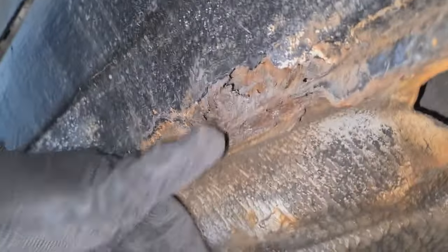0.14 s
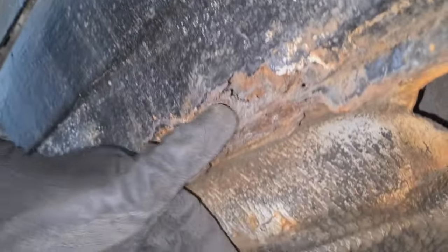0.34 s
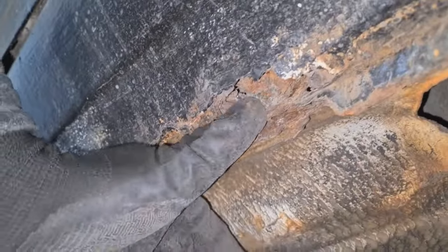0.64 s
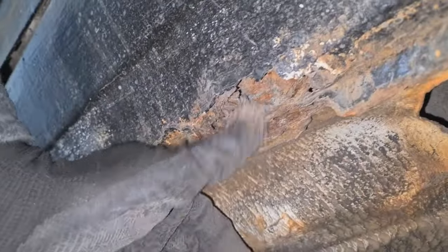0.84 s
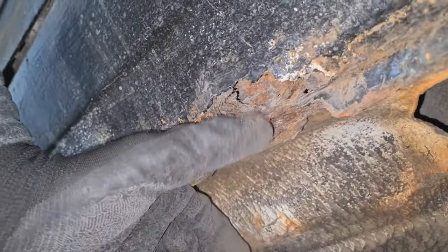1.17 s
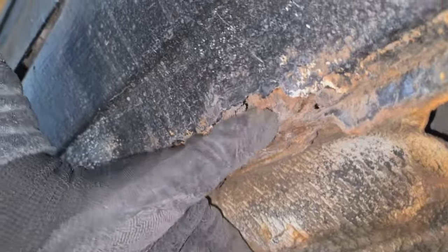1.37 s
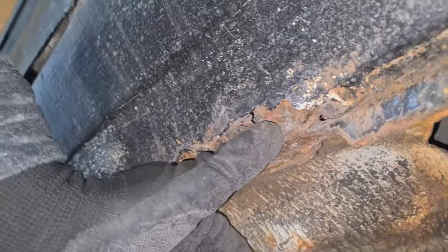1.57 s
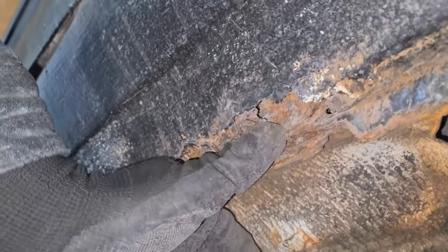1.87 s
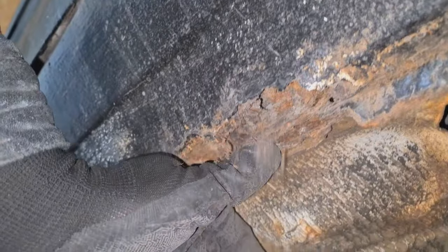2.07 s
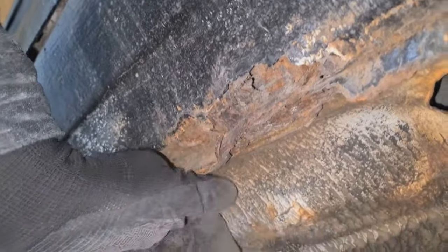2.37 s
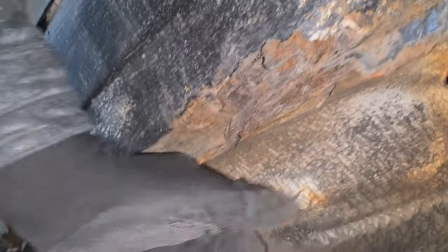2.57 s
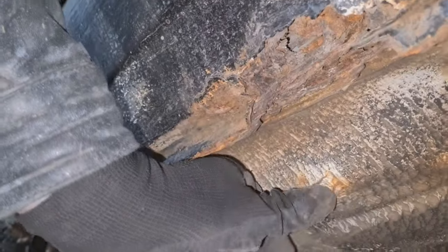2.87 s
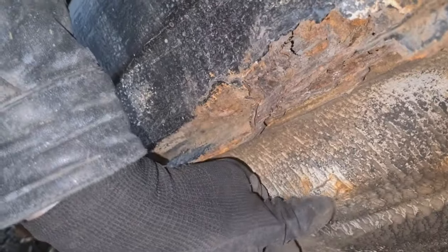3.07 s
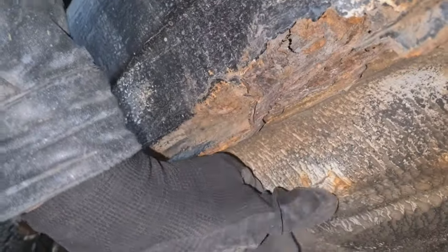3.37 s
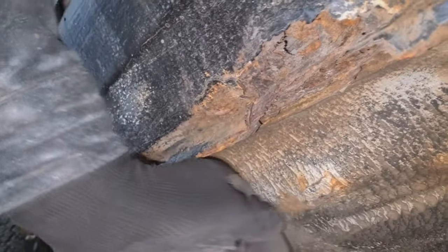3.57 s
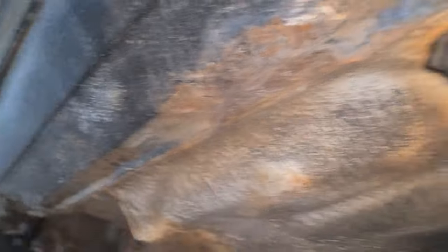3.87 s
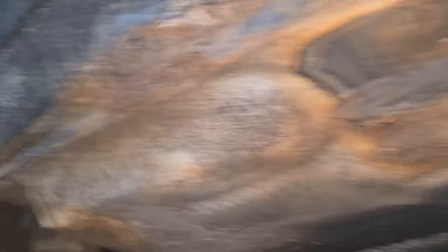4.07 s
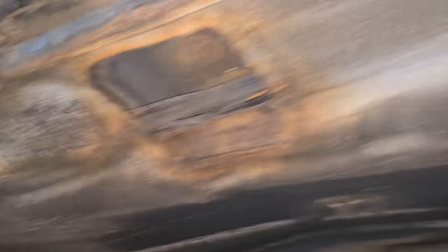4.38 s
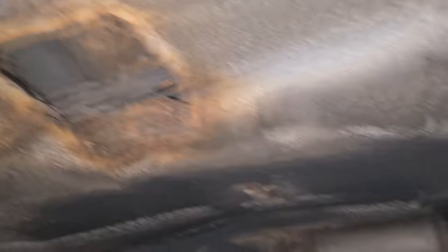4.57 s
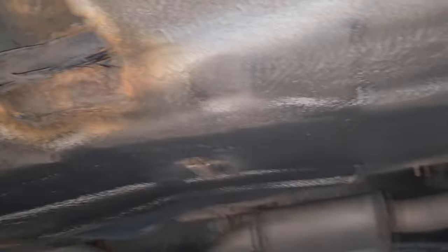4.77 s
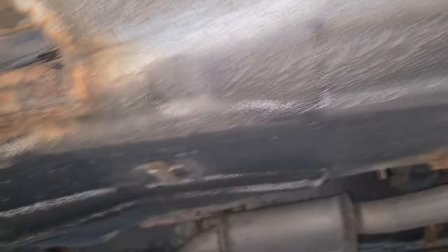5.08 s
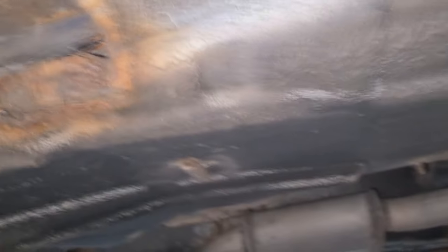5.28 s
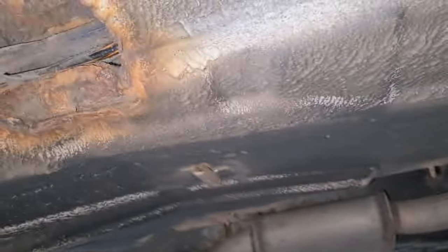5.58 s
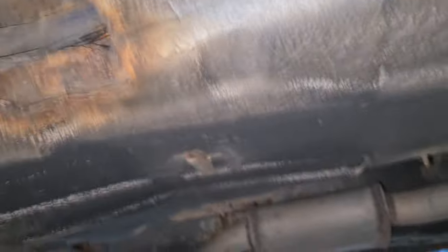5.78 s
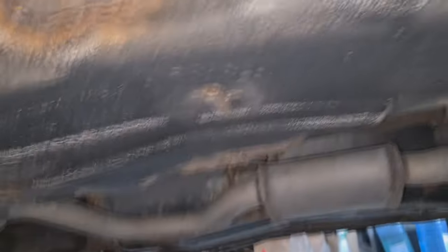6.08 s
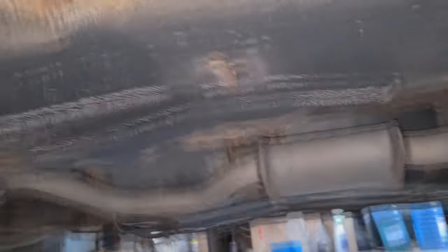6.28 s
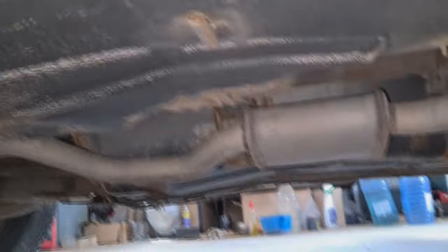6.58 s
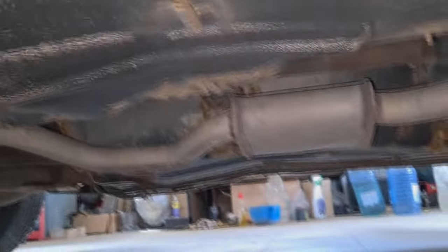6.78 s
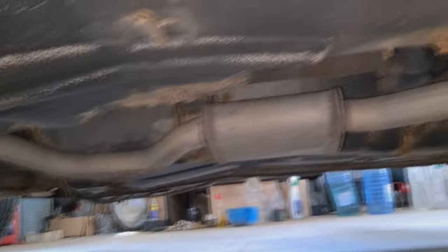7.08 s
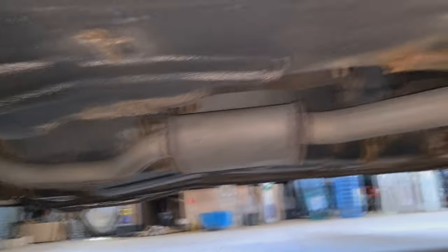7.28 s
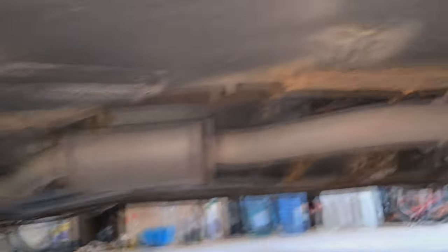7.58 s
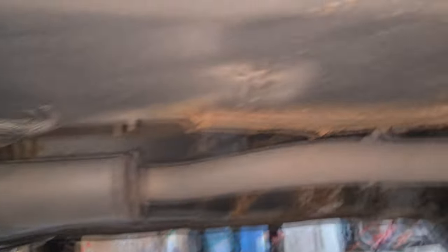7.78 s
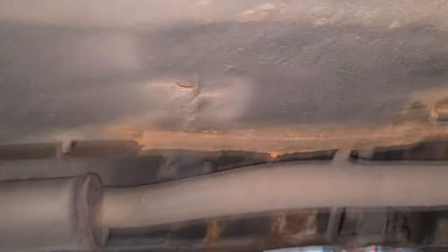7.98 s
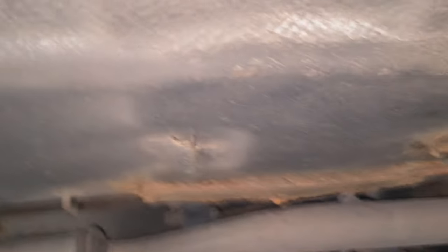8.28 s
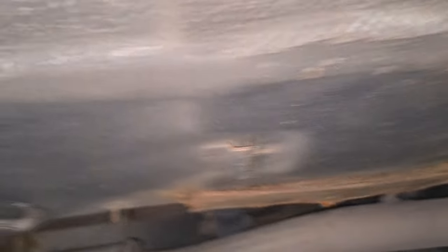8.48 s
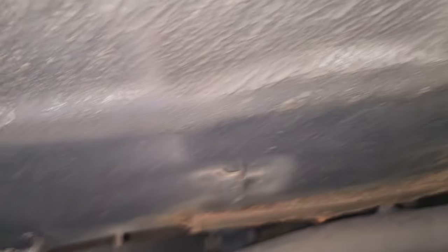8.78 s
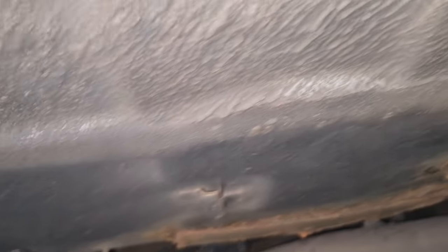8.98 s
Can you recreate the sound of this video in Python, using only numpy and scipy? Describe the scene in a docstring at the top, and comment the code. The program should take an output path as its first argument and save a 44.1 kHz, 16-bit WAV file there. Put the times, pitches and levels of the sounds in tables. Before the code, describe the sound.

A gloved hand scrapes, taps and snaps brittle rusty sheet metal up close, then a jacket sleeve swishes past over deep engine hum.

```python
"""A gloved hand rubs and prods rusty metal under a car: filtered bursts of random catches scrape and crack.
Knocks, booms and ringing modes add hollow taps, thuds, snaps and zings to the contact.
From about four seconds a jacket sleeve swishes close by, in dense noisy grains, as prods and taps go on.
Behind are two engines gliding in speed, as harmonic tones, a deep hum, faint machine tones and noisy air."""
import sys
import numpy as np
from scipy import signal
from scipy.fft import rfft, irfft
from scipy.io import wavfile
from scipy.ndimage import uniform_filter1d

SR = 44100
rng = np.random.default_rng(int(sys.argv[2]) if len(sys.argv) > 2 else 0)


def inscribe(sig):
    """Save sig as 16-bit PCM at rate SR to the path in sys.argv[1].

    A 1-D sig is mono; a 2-D sig holds one channel per row.
    Samples are clipped to [-1, 1] before scaling.
    """
    pcm = np.round(np.clip(np.atleast_2d(sig).T, -1, 1) * 32767)
    wavfile.write(sys.argv[1], SR, pcm.astype(np.int16))


N = 403074
T = np.arange(N) / SR


def undb(db):
    """Decibels to gain."""
    return 10 ** (np.asarray(db) / 20)


def unit(x):
    """Scale to rms 1."""
    return x / np.sqrt(np.mean(x ** 2) + 1e-20)


def decay(t, t60):
    """Exponential fade that falls 60 dB in t60 seconds."""
    return np.exp(-np.log(1000) * t / t60)


def controls(rows):
    """The columns of a curve table, interpolated at every sample."""
    s, *columns = np.transpose(rows)
    return [np.interp(T, s, column) for column in columns]


def band(x, lo_hz, hi_hz, order=2):
    """Butterworth band-pass."""
    sos = signal.butter(order, [lo_hz, min(hi_hz, SR / 2 - 1)], "band", fs=SR, output="sos")
    return signal.sosfilt(sos, x + 1e-18)


def colour(x, spectrum):
    """Minimum-phase filter with the given (f/Hz, gain/dB) shape."""
    size = 2048
    hz, db = np.transpose(spectrum)
    f = np.maximum(np.arange(size // 2 + 1) * SR / size, 1)
    gain = undb(np.interp(np.log(f), np.log(hz), db))
    # folding the cepstrum puts the filter's energy as early as it can go
    cepstrum = irfft(np.log(gain))
    cepstrum[1:size // 2] *= 2
    cepstrum[size // 2 + 1:] = 0
    response = irfft(np.exp(rfft(cepstrum)))
    return np.apply_along_axis(signal.oaconvolve, -1, x, response)[..., :N]


def walk(rate):
    """Smooth random wander of rms 1, with a new target `rate` times a second."""
    k = int(SR / rate)
    steps = np.repeat(rng.standard_normal(N // k + 1), k)
    return unit(uniform_filter1d(steps, k)[:N])


def place(x, pan_db):
    """Lean a sound to the left (positive) or right (negative)."""
    left = undb(pan_db)
    return x * np.array([[left], [1]]) * 2 / (1 + left)


def registers(x):
    """Boom, scrape, rasp and hiss of a stereo contact sound, each with its centre at rms 1."""
    edges = [(150, 760), (800, 2500), (2500, 7000), (7000, 17000)]
    filters = [signal.butter(3, edge, "band", fs=SR, output="sos") for edge in edges]
    parts = [signal.sosfiltfilt(sos, x) for sos in filters]
    return [part / part.mean(axis=0).std() for part in parts]


def blend(scrape, rasp, rasp_db):
    """A sharper contact moves energy from the scrape into the rasp."""
    share = np.clip(undb(rasp_db), .05, .96)
    return np.sqrt(1 - share ** 2) * scrape + share * rasp


def catches(per_s, spread_db):
    """Tiny catches of a rough surface at random moments, with random strength and polarity."""
    hit = rng.random(N) < per_s / SR
    strength = undb(spread_db * np.minimum(rng.exponential(size=N), 4))
    return hit * rng.standard_normal(N) * strength


def grains(per_s, spread_db, own_db):
    """Catches reach both ears; their scatter off nearby surfaces is separate noise at each ear."""
    shared = catches(per_s, spread_db)
    burst = np.sqrt(np.abs(signal.lfilter([.02], [1, -.98], shared ** 2)))  # fast rise, short tail
    return shared + undb(own_db) * burst * rng.standard_normal((2, N))


def shifting(x, depth_db):
    """As the contact point moves, different resonances come and go: six bands wander in level."""
    edges = np.geomspace(800, 6400, 7)
    return x + sum((undb(depth_db * walk(9)) - 1) * band(x, lo, hi, order=1)
                   for lo, hi in zip(edges, edges[1:]))


# resonances of the gap under the floor pan: f/Hz, width/Hz, level/dB
GAP_RESONANCES = [(1093, 135, -1.5), (1670, 130, -7.5), (2590, 53, -12), (3400, 87, -13), (3420, 330, -13),
                  (9020, 640, -0.5)]


def cavity(x):
    """The narrow space under the car favours a few bands."""
    return x + sum(undb(db) * band(x, hz - width / 2, hz + width / 2, order=1)
                   for hz, width, db in GAP_RESONANCES)


def swell(start, length, growth_db, db):
    """Power of one movement: it sets in, grows or wanes evenly in dB while it lasts, and dies away."""
    # each flank spans 30 dB in its own time plus an edge that softens long swells
    attack_s, release_s, edge = 0.008, 0.02, 0.48 * length
    before = np.maximum(start - T, 0) / (attack_s + edge)
    after = np.maximum(T - start - length, 0) / (release_s + edge)
    outside = before + after
    drop_db = 20 * np.minimum(outside * (1 + outside / 2), 10)
    progress = np.clip((T - start) / length, 0, 1)
    return undb(db + growth_db * (progress - .5) - drop_db) ** 2


def strokes(rows):
    """Overlapping strokes add in power: their level, and the rasp and hiss against it, in dB."""
    power = np.zeros((3, N))
    for start, length, growth_db, db, rasp_db, hiss_db in rows:
        power += np.outer(undb([0, rasp_db, hiss_db]) ** 2, swell(start, length, growth_db, db))
    total, rasp, hiss = 10 * np.log10(power)
    return total, rasp - total, hiss - total


# tone of the room air: f/Hz, gain/dB
AIR_SPECTRUM = [(59, -19.5), (100, -12), (249, -24.5), (328, -30), (513, -34), (634, -33), (801, -40.5),
                (1150, -40.5), (1280, -43.5), (2220, -47.5), (4470, -54), (6420, -71), (16000, -58.5)]
# how the room air rises and falls, before trim: t/s, level/dB
AIR_LEVEL = [(0, -62.5), (1.2, -65), (2.2, -64.5), (2.8, -67), (4.2, -64), (5.5, -67.5), (6.4, -64.5),
             (6.8, -58.5), (7.3, -64.5), (7.8, -60.5), (9.14, -65.5)]


def air(rumble_db=-55, side_db=-14, air_db=-0.5):
    """Room air: a rumble common to both ears under a faint diffuse hiss, both of filtered noise."""
    db, = controls(AIR_LEVEL)
    mid, side = (colour(rng.standard_normal(N), AIR_SPECTRUM) for _ in range(2))
    side = undb(side_db) * side + 0.68 * band(side, 630, 17000, order=1)
    hiss = (mid + np.array([side, -side])) / band(mid, 220, 700).std()
    rumble = unit(band(rng.standard_normal(N), 33.5, 102.0, order=3))
    return undb(db + air_db) * hiss + undb(rumble_db) * rumble


# faint machine tones that come and go: start t/s, length t/s, f/Hz, level/dB
MACHINE_TONES = [(0, 1.65, 141.1, -61.5), (2.8, 0.15, 136.2, -53.5), (2.898, 2.8, 113.5, -61),
                 (3.899, 2.03, 142.3, -63.5), (3.6, 1.49, 353, -77), (4.9, 0.9, 631, -79),
                 (6.003, 8.8, 172.1, -66), (6.702, 1, 99.7, -53.5)]


def tones(drift=.004, waver_db=2, fade_s=0.25):
    """Machine tones as sines that waver in pitch and level, with fades outside their listed spans."""
    out = np.zeros(N)
    for start, length, hz, db in MACHINE_TONES:
        fade = np.clip(np.minimum(T - start, start + length - T) / fade_s + 1, 0, 1)
        level = undb(db + waver_db * walk(3))
        phase = 2 * np.pi * np.cumsum(hz * (1 + drift * walk(4))) / SR
        out += fade * level * np.sin(phase)
    return np.sqrt(2) * out


# swells of the deep hum: start t/s, length t/s, growth/dB, level/dB
HUM_SWELLS = [(1.4, 0.46, 0, -42), (3.74, 0.33, -1, -44), (6.196, 0.5, 4, -39), (7.7, 1.37, 0, -46.5)]


def hum(centre_hz=46.8, drift=0.012):
    """A deep, nearly pure sine drifts slightly in pitch and swells now and then."""
    phase = 2 * np.pi * np.cumsum(centre_hz * (1 + drift * walk(1.89))) / SR
    return np.sqrt(2 * sum(swell(*row) for row in HUM_SWELLS)) * np.sin(phase)


# standing waves of the garage that lift the engines' overtones: f/Hz, width/Hz, level/dB
GARAGE_WAVES = [(101.46, 1.76, 21), (138.6, 2.6, 7), (163.5, 19.3, 6)]
# an engine that picks up from idle, holds its speed and fades: t/s, firing f/Hz, level/dB
STEADY_ENGINE = [(0, 50.47, -43.5), (1.15, 51.21, -42.5), (1.68, 47.37, -45), (2.2, 61.66, -37.5),
                 (2.7, 63.9, -43), (3.1, 62.23, -52), (3.85, 60.27, -40.5), (5.7, 59.92, -43.5),
                 (6.35, 60.45, -39.5), (6.75, 59.96, -48), (7.1, 59.3, -68), (9.14, 58.45, -66)]
# an engine that runs fast, drops and pulls again: t/s, firing f/Hz, level/dB
FAST_ENGINE = [(0, 76.85, -46.5), (1.3, 72.84, -49), (2, 83.1, -48.5), (2.85, 67.4, -47),
               (3.6, 76.8, -39.5), (4.3, 78.1, -48.5), (5.85, 77.8, -45.5), (6.25, 74.97, -37.5),
               (6.6, 72.27, -42), (7.05, 61.36, -35), (7.42, 51.5, -39.5), (7.7, 61.05, -32.5),
               (8, 63.4, -39), (8.7, 62.95, -36), (9.14, 56.6, -42)]


def engine(rows, half_db, second_db, third_db, waver_db, sway_db):
    """Walls pass the firing tone, uneven cylinders' half tone and overtones; standing waves lift these."""
    hz, db = controls(rows)
    phase = 2 * np.pi * np.cumsum(hz) / SR
    half = undb(half_db) * band(np.sin(phase / 2), 33.4, 57, order=6)
    second = undb(second_db + 2 * walk(3.1)) * np.sin(2 * phase)
    third = undb(third_db + 2 * walk(4.1)) * np.sin(3 * phase)
    overtones = second + third
    standing = sum(undb(lift) * band(overtones, f - width / 2, f + width / 2, order=1)
                   for f, width, lift in GARAGE_WAVES)
    level = undb(db + waver_db * walk(12) + sway_db * walk(2.99))
    return np.sqrt(2) * level * (np.sin(phase) + half + overtones + standing)


# tone of the jacket cloth: f/Hz, gain/dB
CLOTH_SPECTRUM = [(200, -7), (400, -9.5), (750, -10), (1000, 0.5), (1350, 2.5), (1700, 5), (2100, 3),
                  (3300, 1.5), (4600, -2), (5600, -10.5), (7200, -27.5), (9000, -28), (12000, -24.5),
                  (16000, -28)]
# sleeve strokes, before trim:
# start t/s, length t/s, growth/dB, level/dB, rasp relative level/dB, hiss relative level/dB
SLEEVE_STROKES = [(3.87, 0.12, -1, -71.5, -4.5, -15), (4.03, 0.13, 2, -68, -5.5, -9),
                  (4.21, 0.18, 3, -69, -5.5, -14), (4.405, 0.07, -1, -63.5, -3, -4.5),
                  (4.49, 0.086, -4, -66.5, -4.5, -11), (4.62, 0.19, 2.5, -70.5, -3, -7),
                  (4.87, .13, -1, -71.5, -4, -10.5), (4.693, 0.018, 2, -61.5, -4.5, -6),
                  (5.19, 0.31, -4.5, -76.5, -8.5, -11), (5.62, 0.33, 4.5, -77, -3.5, 0.5),
                  (5.798, 0.042, -1, -55.5, -1.5, -7.5), (6.089, 0.018, 6, -47.5, -4, -8.5),
                  (6.135, 0.025, -2, -48, -5, -5), (6.18, .22, -5, -64, -4, -8),
                  (6.56, 0.26, -9.5, -60, -5.5, -4), (6.84, 0.21, -2, -60, -4, -10),
                  (6.915, 0.031, 1, -52, -3, -14.5), (7.088, 0.028, 2, -44.5, -0.5, -3),
                  (7.122, 0.061, -3, -44, -2.5, -4), (7.205, 0.069, -0.5, -43.5, -1.5, -2),
                  (7.37, 0.037, -3, -46.5, -2, -11.5), (7.435, 0.035, -1, -54, -2.5, -10.5),
                  (7.48, 0.29, -0.5, -63, -6, -14), (7.74, 0.072, 1, -60.5, -5.5, -15),
                  (7.83, 0.092, 0.5, -54.5, -5, -16.5), (7.96, .07, 1, -55, -3.5, -14),
                  (8.04, 0.098, 5, -48.5, -1, -1), (8.22, 0.34, 1.5, -65.5, -3, -6.5),
                  (8.63, 0.062, -0.5, -60, -4.5, -13), (8.74, 0.31, 1.5, -68, -4, -14.5)]


def sleeve(flap_db=-20, gain_db=-1):
    """Fine threads slide over each other at the right, gripping and slipping: a dense, gritty swish."""
    db, rasp_db, hiss_db = strokes(SLEEVE_STROKES)
    slips = undb(1.5 * walk(140) + 1.0 * walk(22))
    threads = grains(per_s=8300, spread_db=0.0, own_db=14.0) * slips
    swish = shifting(cavity(colour(threads, CLOTH_SPECTRUM)), depth_db=1.5)
    flap, scrape, rasp, hiss = registers(swish)
    body = place(blend(scrape, rasp, rasp_db), pan_db=-7.0)
    sound = body + undb(hiss_db) * hiss + undb(flap_db) * flap
    return sound * undb(db + gain_db)


# the hand's weight thuds into the panel, before trim: t/s, level/dB
HAND_THUDS = [(0.867, -39), (.895, -32), (0.907, -41), (0.920, -41), (0.935, -45), (0.947, -40.5),
              (2.133, -42), (2.244, -46), (2.342, -39.5), (3.257, -44)]


def thuds(t60=0.048, gain_db=-1.5):
    """A push of the whole finger flexes the panel, which booms for a moment as low band noise."""
    out, t = np.zeros(N + SR), T[:SR // 6]
    for s, db in HAND_THUDS:
        i = int(s * SR)
        boom = unit(band(rng.standard_normal(len(t)), 140, 310))
        out[i:i + len(t)] += undb(db + gain_db) * boom * decay(t, t60)
    return out[:N]


# blunt, hollow taps, before trim: t/s, level/dB, tuning of the panel at that spot [ratio]
PANEL_TAPS = [(0.198, -38.5, 0.98), (0.867, -42, .97), (0.939, -34, 1), (1.327, -47.5, 0.98),
              (1.854, -54, 0.95), (2.058, -43, 0.98), (2.284, -45, 1.07), (2.340, -33.5, 0.96),
              (2.991, -45, 1.12), (3.037, -47, 1.05), (3.254, -44, 0.93), (3.88, -52, 1.1),
              (4.740, -45.5, 1.1), (6.105, -32, 1.0), (6.171, -35.5, 1.1), (7.372, -34.5, 1.24)]
# panel modes that the taps ring: f/Hz, level/dB, decay t60/s
PANEL_MODES = [(974, -25, .04), (1045, 6, 0.03), (1160, -4, 0.038), (1440, -27, 0.026), (1740, -28, 0.033),
               (3460, -4.5, 0.029)]


def taps(knock_db=-5, knock_t60=0.032, gain_db=-8):
    """Blunt contacts give a short knock and a damped, hollow ring that differs from spot to spot."""
    out, t = np.zeros(N + SR), T[:SR // 4]
    for s, tap_db, tuning in PANEL_TAPS:
        i = int(s * SR)
        detune = tuning * (1 + 0.011 * rng.standard_normal(len(PANEL_MODES)))
        ring = sum(undb(db) * np.sin(2 * np.pi * hz * d * t) * decay(t, t60)
                   for (hz, db, t60), d in zip(PANEL_MODES, detune))
        knock = unit(band(rng.standard_normal(len(t)), 1160, 1650)) * decay(t, knock_t60)
        out[i:i + len(t)] += undb(tap_db + gain_db) * (ring + undb(knock_db) * knock)
    return place(band(out[:N], 830, 5000, order=4), pan_db=-8.5)


# springing rust edges: t/s, level/dB, bright modes against the low ones level/dB
EDGE_SNAPS = [(1.464, -53, 8), (1.607, -39, 12), (1.854, -39, -3), (2.058, -44, 0), (2.130, -35, 4),
              (2.341, -31.5, 2), (2.990, -39.5, -1), (3.036, -39.5, -1), (3.257, -33, -4), (4.735, -48, 5)]
# modes of the rusted edge: f/Hz, level/dB
EDGE_MODES = [(860, -7), (1060, 0), (1240, -4), (1710, -9), (2170, -7), (2580, -2), (3270, -3), (3590, -2),
              (4025, -7), (4720, -6)]


def snaps(t60=0.049, tick_db=2, tick_s=0.00048):
    """A stiff edge's sudden release gives a bare tick; it rings on, a little differently each time."""
    out, t = np.zeros((2, N + SR)), T[:SR // 6]
    hz, db = np.transpose(EDGE_MODES)
    bright = hz > 2000
    for s, snap_db, bright_db in EDGE_SNAPS:
        i = int(s * SR)
        tuned = hz * (1 + .012 * rng.standard_normal(len(hz)))
        modes = np.sin(2 * np.pi * np.outer(tuned, t)) * decay(t, t60)
        ring = undb(db + bright_db * bright + 2 * rng.standard_normal((2, len(hz)))) @ modes
        tick = band(rng.standard_normal((2, len(t))) * np.exp(-t / tick_s), 700, 5200)
        sound = ring / np.abs(ring).max() + undb(tick_db) * tick / np.abs(tick).max()
        out[:, i:i + len(t)] += undb(snap_db) * sound
    return place(out[:, :N], pan_db=-3.5)


# moments when the rubbing catches one resonance, before trim:
# start t/s, length t/s, growth/dB, level/dB, f/Hz
RUBBING_ZINGS = [(0.57, 0.052, -1, -63, 3290), (1.97, 0.18, 5, -67, 2600), (1.96, 0.16, 4, -67.5, 3450),
                 (2.9, 0.13, 2, -71, 3500), (3.19, 0.04, 0, -64, 2150), (6.565, .065, 0, -54.5, 3340),
                 (7.083, 0.058, -2, -45.5, 3400), (7.114, 0.17, -9, -52.5, 1676),
                 (7.82, 0.11, -1, -61, 1720), (8.054, 0.096, 2, -58.5, 1125)]


def zings(width=0.17, gain_db=2.0):
    """Fine catches ring a small cluster of resonances in broken bursts for part of a stroke."""
    out, grit = np.zeros((2, N)), grains(per_s=900, spread_db=2, own_db=0)
    flickers = [undb(4 * walk(45)) for _ in range(3)]
    for start, length, growth_db, db, hz in RUBBING_ZINGS:
        # the span leaves room for the swell's flanks
        span = slice(max(int((start - .2) * SR), 0), int((start + length + .4) * SR))
        edges = hz * (1 + width * np.linspace(-.5, .5, len(flickers) + 1))
        ring = sum(band(grit[:, span] * flicker[span], lo, hi)
                   for flicker, lo, hi in zip(flickers, edges, edges[1:]))
        out[:, span] += unit(ring) * np.sqrt(swell(start, length, growth_db, db)[span])
    return place(out, pan_db=-6.5) * undb(gain_db)


# tone of the crumbling flakes: f/Hz, gain/dB
FLAKE_SPECTRUM = [(150, -2.5), (450, -1.5), (780, -6.5), (1050, -4), (1500, -8.5), (2500, -1), (3500, -4),
                  (4800, -4), (6000, -17), (7200, -18.5), (9000, -19), (16000, -17.5)]
# fingertip prods, snapping flakes and small clicks, before trim:
# t/s, level/dB, rasp relative level/dB, hiss relative level/dB
FINGER_PRODS = [(0.139, -38, -1.5, 0.5), (0.191, -36.5, -14, -7), (0.386, -48, -6, 5),
                (0.831, -48.5, -7, -14), (0.854, -43, -11, -14), (0.867, -32.5, -15, -3),
                (0.892, -35, -11, -8), (0.900, -34, -12, -13), (0.914, -35, -19, -12),
                (0.932, -27, -10.5, -7.5), (0.94, -31.5, -11, -25), (1.606, -41, -7, -32),
                (1.855, -36.5, -20, -22), (1.984, -52, -6, -4), (2.014, -51, -7, -20),
                (2.057, -51, -11, -20), (2.127, -32, -13, -14), (2.244, -41, -13, -7),
                (2.285, -40.5, -14, -17), (2.324, -31.5, -18, -18), (2.338, -32, -6, -4.5),
                (2.376, -53, -8, -2), (2.416, -48.5, -4, 3), (2.497, -51.5, -12, 2.5),
                (2.952, -52, -10, -14), (2.989, -45.5, -5.5, -5), (3.035, -43.5, -9, -9),
                (3.137, -46, -17, -22), (3.22, -47, -18, -26), (3.256, -35, -9.5, -21),
                (3.395, -53, -18.5, -33), (3.575, -37, -11, -12), (3.679, -42, -7, -17),
                (4.126, -51, -13, -20), (4.423, -57, -6, 5), (4.732, -46, -8.5, -5.5),
                (5.788, -45.5, -10, -9), (6.085, -40, -9.5, -6.5), (6.192, -48, -7, -14),
                (6.624, -42, -17, -16), (7.367, -32.5, -14, -9.5), (7.378, -33.5, -5, -6),
                (7.406, -41, -6, -20), (8.603, -46.5, -12, 0)]


def prods(t60=0.036, crack_s=0.00041, boom_db=-13, crest_db=7, hiss_trim_db=3.0, cushion_s=0.00066):
    """Each prod is a crack, cushioned by the fabric, followed by a quickly fading crumble of grains."""
    out, t = np.zeros((2, N + SR)), T[:SR // 6]
    flakes = colour(grains(per_s=16000, spread_db=4.0, own_db=9.0), FLAKE_SPECTRUM)
    layers = np.array(registers(cavity(flakes)))
    fade = decay(t, t60) + np.exp(-t / crack_s)
    fade *= 1 - np.exp(-t / cushion_s)  # the fabric softens the onset
    for s, db, rasp_db, hiss_db in FINGER_PRODS:
        i = int(s * SR)
        boom, scrape, rasp, hiss = layers[:, :, i:i + len(t)]
        crumble = undb(boom_db) * boom + blend(scrape, rasp, rasp_db + crest_db)
        crumble += undb(hiss_db + hiss_trim_db) * hiss
        out[:, i:i + len(t)] += crumble * fade * undb(db - crest_db)
    return out[:, :N]


# tone of the rusty sheet: f/Hz, gain/dB
RUST_SPECTRUM = [(150, 4.5), (290, -4.5), (400, -8.5), (780, -14), (1030, -13), (1500, -18), (2100, -15),
                 (2700, -14.5), (3600, -14), (4800, -18), (6000, -28), (7200, -30.5), (9000, -24),
                 (16000, -20.5)]
# glove strokes on the rust, before trim:
# start t/s, length t/s, growth/dB, level/dB, rasp relative level/dB, hiss relative level/dB
GLOVE_STROKES = [(.146, 0.035, -11, -59.5, 1, -5), (.399, 0.048, -6.5, -52.5, -2.5, -8.5),
                 (.54, 0.04, 0.5, -56, -7, -16), (.585, .042, -1, -63, -3, -14),
                 (.66, 0.2, -4, -76.5, -1, -2.5), (0.825, 0.057, 8, -55.5, -2, -8),
                 (0.875, 0.053, 6.5, -45.5, -2.5, -5), (0.96, 0.099, -12, -66, -6.5, -25.5),
                 (1.17, 0.069, -2, -78, -1.5, 12), (1.32, .04, -3, -67, -12, -24),
                 (1.375, 0.06, -1, -65.5, -4, -13), (1.455, 0.049, -4, -66, -2.5, -15),
                 (1.563, .025, -6, -67, -3, -18), (1.61, 0.033, -9, -63.5, -2, -19),
                 (1.69, 0.18, 4, -71.5, -2, -10), (1.96, 0.16, 8.5, -62.5, -4, -7),
                 (2.123, 0.021, -8, -49.5, -2.5, -12.5), (2.32, 0.035, -9, -50.5, -2.5, -15),
                 (2.36, 0.22, -13, -69, -2.5, -3.5), (2.67, 0.069, 2.5, -66.5, -3.5, -9.5),
                 (2.92, 0.12, -7, -71.5, -10, -11), (3.14, 0.037, -1, -61.5, -4, -16),
                 (3.195, 0.048, -5, -61.5, -4, -17), (3.515, 0.062, 12, -60.5, -4, -10.5),
                 (3.59, 0.097, -7, -62.5, -4, -11.5)]


def glove(boom_db=-11, firm_db=-51, snag_db=15, gain_db=-1.0):
    """Knit fabric slips unevenly and snags on rust grains; firmer pressure makes the panel boom more."""
    db, rasp_db, hiss_db = strokes(GLOVE_STROKES)
    grit = grains(per_s=6000, spread_db=-2.0, own_db=13.0) * undb(2.3 * walk(190))
    grit += undb(snag_db) * catches(per_s=190, spread_db=3)
    rubbing = shifting(cavity(colour(grit, RUST_SPECTRUM)), depth_db=2.2)
    boom, scrape, rasp, hiss = registers(rubbing)
    pressure_db = np.clip(db - firm_db, -8, 7)
    body = place(blend(scrape, rasp, rasp_db), pan_db=-4.0)
    sound = body + undb(hiss_db) * hiss + undb(boom_db + pressure_db) * boom
    return sound * undb(db + gain_db)


def ports(x, alike_hz=1700, spread=0.48, lag_s=0.00019):
    """Close low sound is much alike at both microphones; all sound reaches the right a little later."""
    mid, side = (x[0] + x[1]) / 2, (x[0] - x[1]) / 2
    lowpass = signal.butter(2, alike_hz, fs=SR, output="sos")
    low_mid, low_side = signal.sosfiltfilt(lowpass, mid), signal.sosfiltfilt(lowpass, side)
    mid = mid + (np.sqrt(2 - spread ** 2) - 1) * low_mid
    side = side - (1 - spread) * low_side
    return np.array([mid + side, np.roll(mid - side, round(lag_s * SR))])


def underbody(x, room_t60=0.18, room_db=-18, near_t60=0.089, near_db=-9):
    """The floor pan scatters sound at once; the garage adds a short, dull tail, different at each ear."""
    t = T[:SR // 2]
    near = rng.standard_normal((2, len(t))) * decay(t, near_t60)
    tail = band(rng.standard_normal((2, len(t))), 180, 8300, order=1) * decay(t, room_t60)
    response = (undb(near_db) * unit(near) + undb(room_db) * unit(tail)) / np.sqrt(len(t))
    return x + signal.oaconvolve(x, response, axes=1)[:, :N]


def scene():
    """Hand and sleeve close by, engines, hum, machine tones and air behind."""
    background = air() + tones() + hum()
    background += engine(STEADY_ENGINE, half_db=-27.0, second_db=-26.5, third_db=-31,
                         waver_db=1.95, sway_db=1.24)
    background += engine(FAST_ENGINE, half_db=-9.0, second_db=-27, third_db=-38,
                         waver_db=2.0, sway_db=1.24)
    contact = sleeve() + thuds() + taps() + snaps() + zings() + prods() + glove()
    return background + underbody(ports(contact))


def record(dry):
    """The recorder cuts the deepest bass (below 32 Hz) and the top (above 15.9 kHz)."""
    dry = signal.sosfilt(signal.butter(8, 32, "high", fs=SR, output="sos"), dry)
    return signal.sosfilt(signal.ellip(10, .2, 70, 15900, fs=SR, output="sos"), dry)


dry = scene()
out = record(dry)
inscribe(out)
```